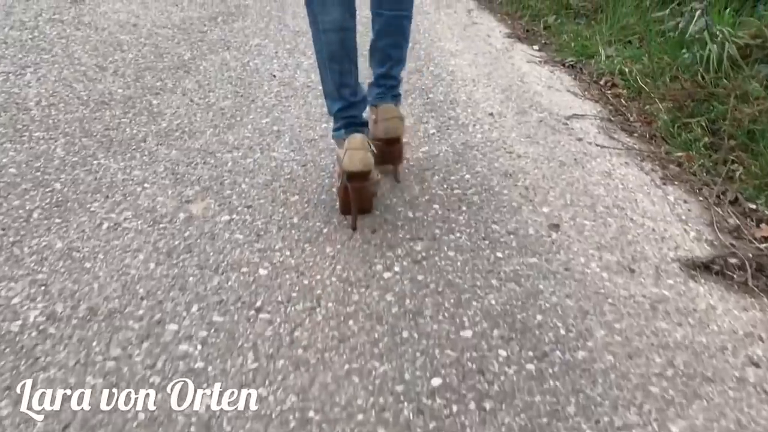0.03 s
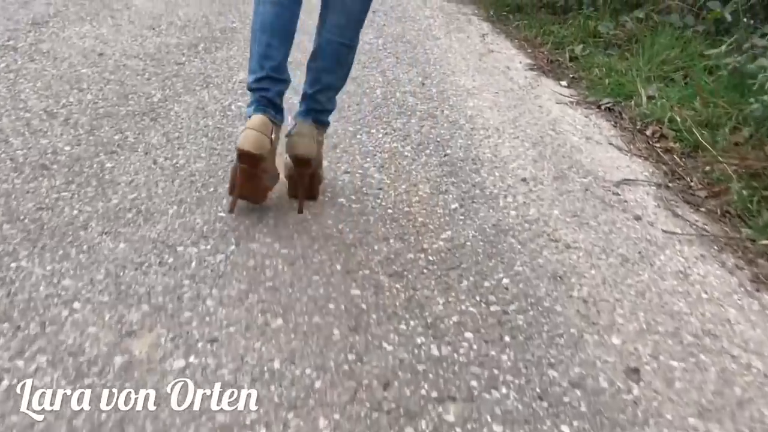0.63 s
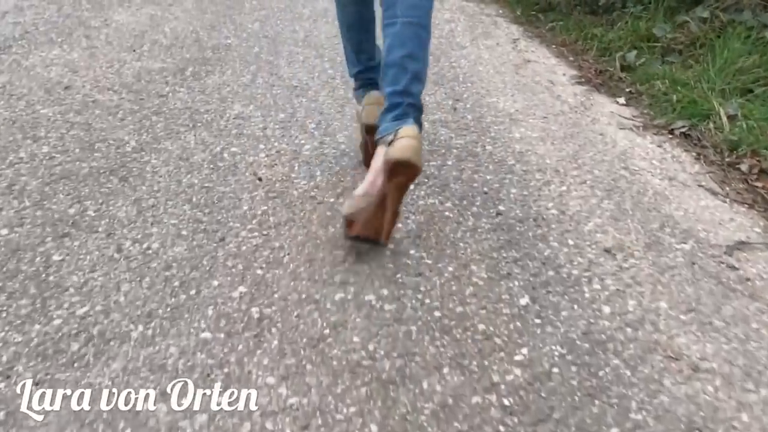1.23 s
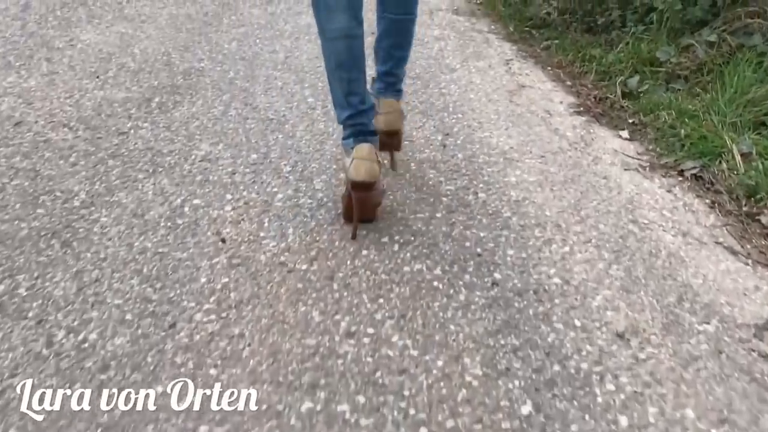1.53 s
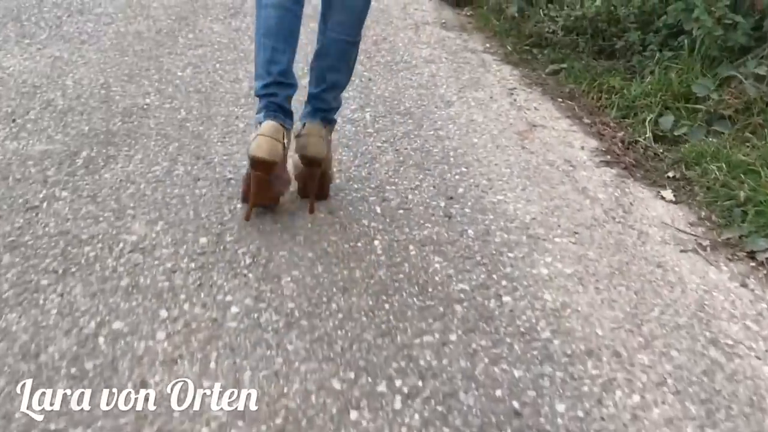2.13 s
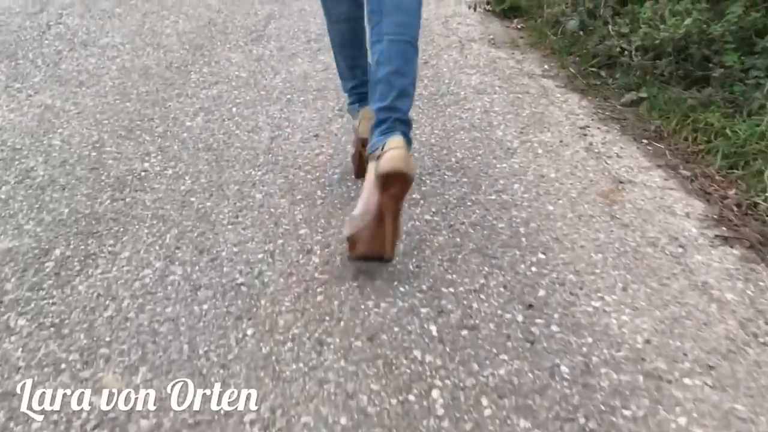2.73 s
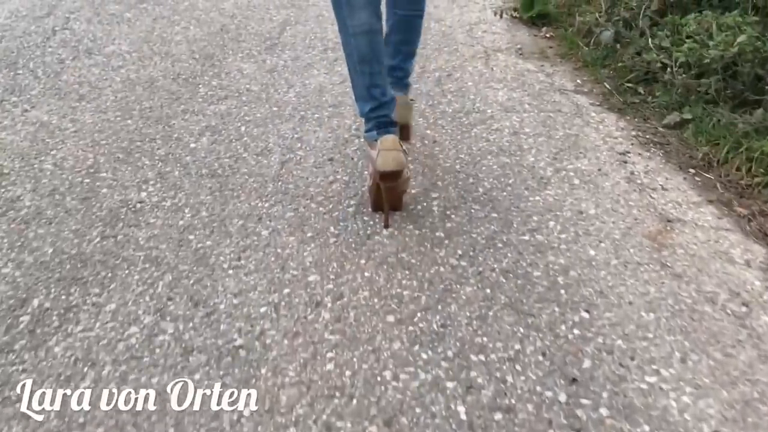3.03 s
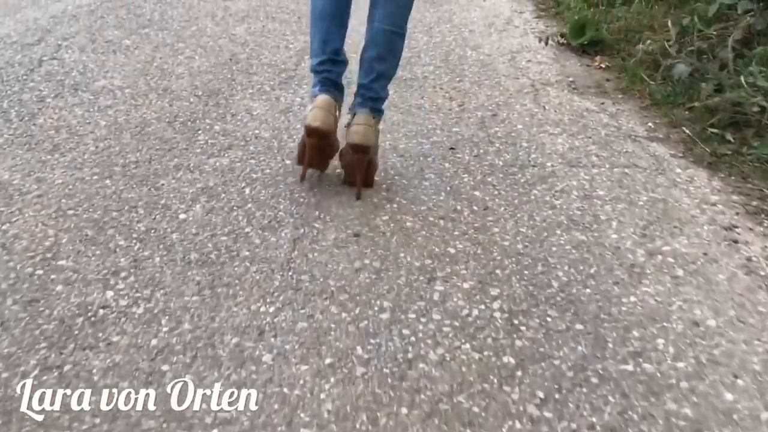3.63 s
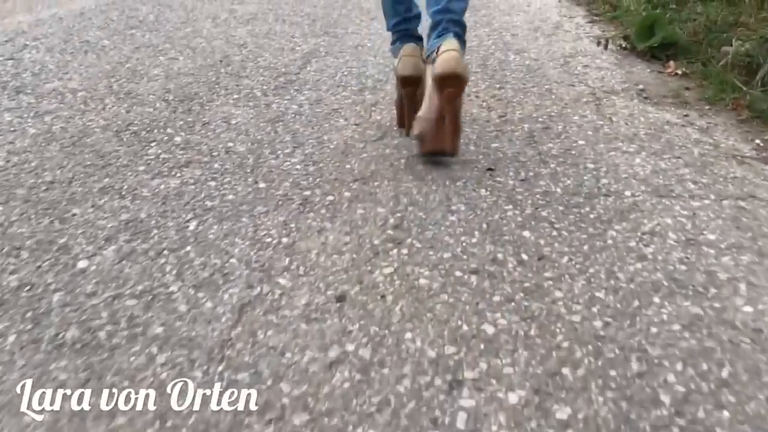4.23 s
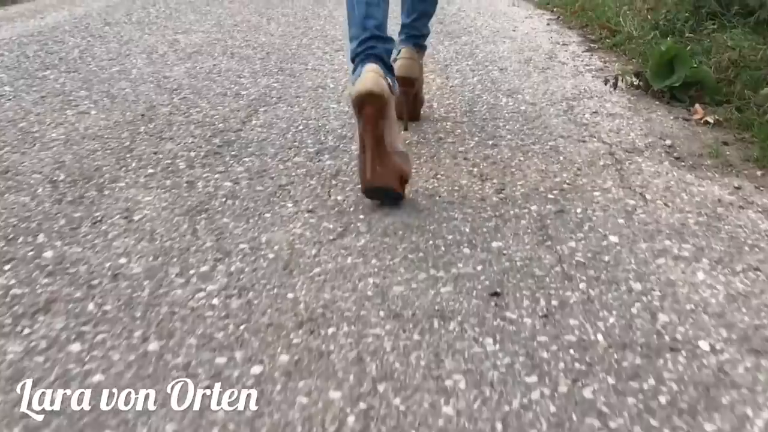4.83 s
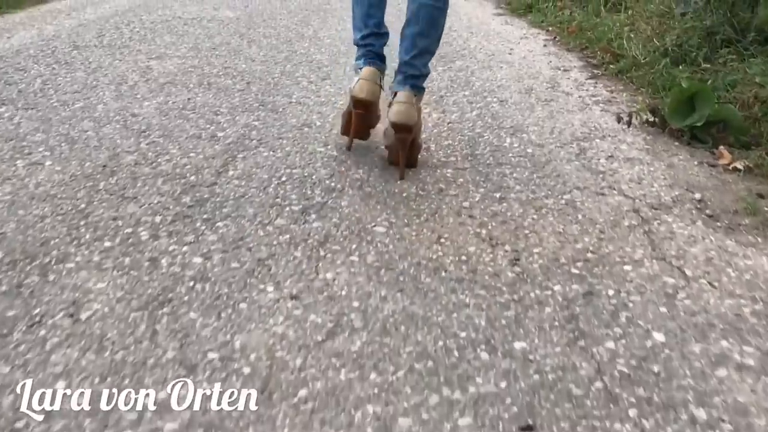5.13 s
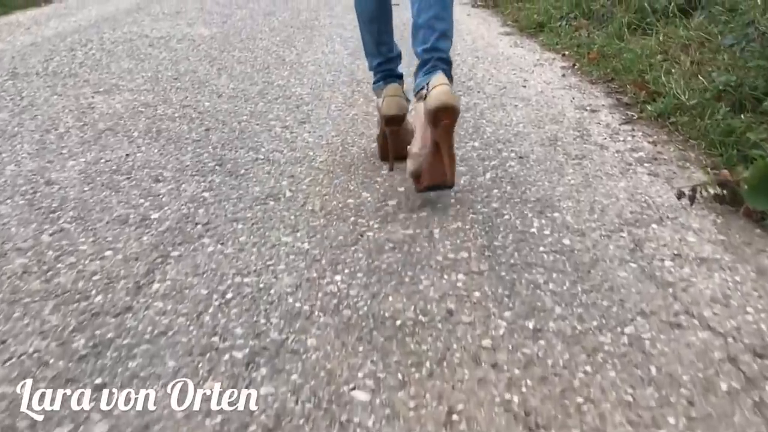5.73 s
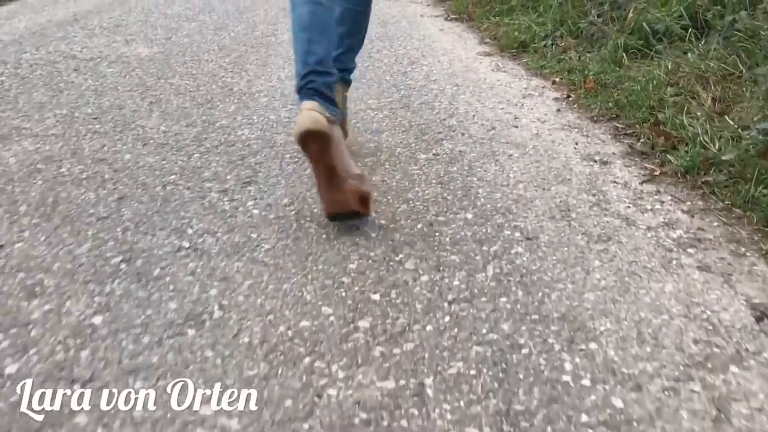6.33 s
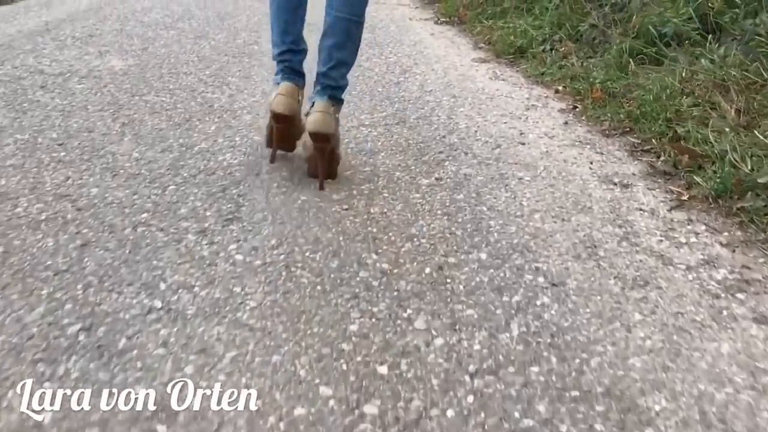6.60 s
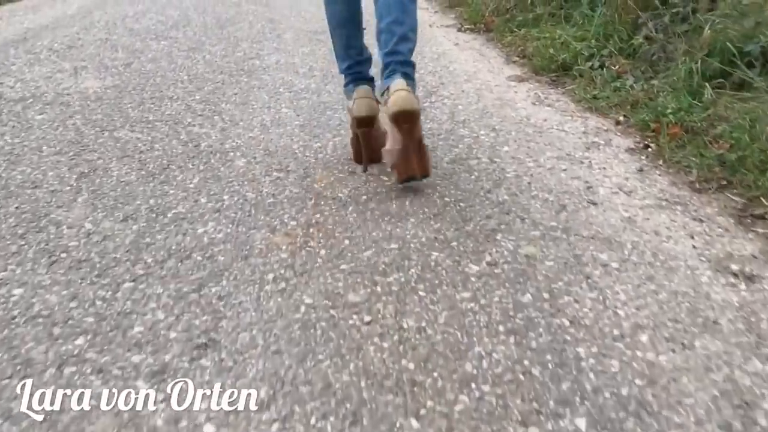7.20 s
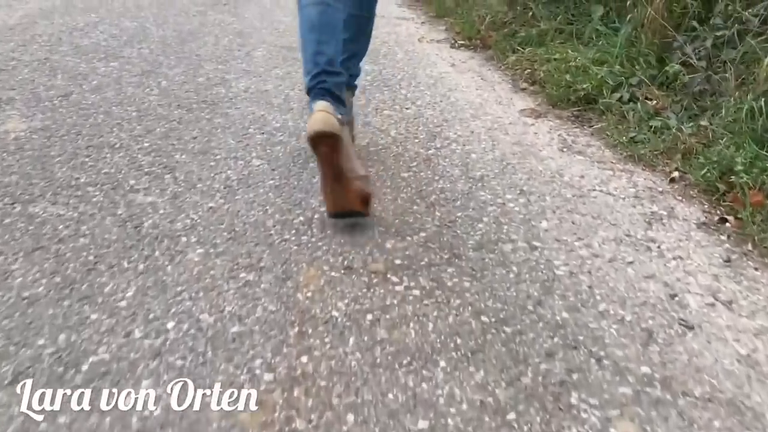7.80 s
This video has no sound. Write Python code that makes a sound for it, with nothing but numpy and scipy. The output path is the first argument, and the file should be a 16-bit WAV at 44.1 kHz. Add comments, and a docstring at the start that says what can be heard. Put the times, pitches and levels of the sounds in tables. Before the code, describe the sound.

A woman walks at an even, unhurried pace in platform high heels on a rough asphalt lane, the microphone following close behind. Each step is a dull heel thump and a hollow sole clack with a gritty scuff. Jeans brush softly between steps. Past the middle a shoe catches the ground twice, then a piece of grit snaps sharply. Faint open air, far traffic and one small bird chip lie underneath.

```python
"""Platform heels on asphalt

A woman walks along a rough lane, the microphone following her. Impacts excite the damped modes of each
shoe: a dull heel thump, then a hollow clack of the sole. Friction, a shower of tiny slips, gives the
gritty roll, the other shoe's push-off and the brush of jeans. Grit snaps underfoot, a swinging shoe
catches the ground twice, a bird chips once, and far traffic hums."""
import sys
import numpy as np
from scipy import signal
from scipy.fft import rfft, irfft, next_fast_len
from scipy.io import wavfile

SR = 44100
rng = np.random.default_rng(int(sys.argv[2]) if len(sys.argv) > 2 else 0)


def pcm_store(signal):
    """Save signal as 16-bit PCM."""
    levels = np.round(np.clip(np.atleast_2d(signal), -1, 1) * 32767)
    wavfile.write(sys.argv[1], SR, levels.astype(np.int16).T)


N = 346626

# Spectra of open air, sole friction, crunching stones and rubbed denim: f/Hz, relative level/dB
AIR_SPECTRUM = [(15, -62), (28, -24.5), (42, -1.5), (80, -2), (125, -10.5), (200, -14.5), (450, -24.5),
                (760, -24.5), (1400, -25.5), (1900, -30), (2700, -31), (5000, -39), (9400, -42.5),
                (10400, -45.5), (12000, -42), (16000, -44.5)]
SCUFF_SPECTRUM = [(100, 8), (400, 5.5), (900, 2.5), (1700, 1.5), (3000, -0.5), (4500, -7.5), (6500, -8.5),
                  (8000, -15.5), (9400, -11.5), (10500, -20), (12000, -14), (14300, -17), (16000, -21)]
CRUNCH_SPECTRUM = [(800, -30), (2000, 4), (2700, -4), (3300, 4.5), (4000, -4), (5500, -33), (9000, -39),
                   (16000, -32.5)]
DENIM_SPECTRUM = [(300, -27), (1500, -3.5), (2500, -4), (3400, 3), (4600, 2.5), (6300, 3), (8000, -1.5),
                  (10500, -2), (13500, -1), (16000, 1)]
# Far cars: nearest t/s, time to fall 3 dB/s (sign immaterial), low roar/dB, upper roar/dB
CARS = [(0, 1.55, -67.5, -65), (3.1, -4.4, -74.5, -71), (5.7, -0.37, -64, -72), (7.598, 0.2, -71.5, -72.5)]
# Far engine notes: start t/s, end t/s, start f/Hz, end f/Hz, level/dB
ENGINES = [(-.3, 6.5, 61.7, 68.25, -57), (6.5, 8, 81.85, 79.4, -60)]
# Modes of heel, sole and grit, before each impact scales them: f/Hz, relative level/dB, T60/s
HEEL_MODES = [(122.2, 5.5, 0.033), (215.7, -6.5, 0.035), (344.1, -10.5, 0.021), (766, -13, 0.003),
              (1345, -16.5, 0.012), (2500, -18, 0.0034)]
SOLE_MODES = [(181, -7.5, 0.023), (338, -3, 0.016), (424, -0.5, 0.0076), (673, -13, 0.019),
              (1096, 9.5, 0.0057), (1222, -2, 0.012), (1730, -2.5, 0.0057), (3450, -9, 0.0039)]
GRIT_MODES = [(2160, -35, 0.00092), (2800, -5.5, 0.002), (3090, 3, 0.00308), (5560, -6.5, 0.00069),
              (8140, -23, 0.0016), (12800, -28, 0.0007)]
# Impacts of heels landing, platforms rocking on the uneven road and large grains snapping:
# t/s, peak level/dB, upper-mode gain/dB, frequency ratio
HEEL_STRIKES = [(.298, -50.5, 1, 0.75), (1.036, -34, 7.5, 0.803), (1.772, -38, 7, 0.75),
                (2.463, -37, 5.5, 0.81), (3.261, -36.5, 7.5, 0.67), (3.924, -33.5, 2, 0.95),
                (4.709, -30.5, 4, 0.92), (5.448, -34, 3, 0.92), (6.134, -35, 7, 0.84), (6.875, -41, 2, 0.8),
                (7.507, -37, 7, 1.48)]
SOLE_ROCKS = [(.447, -39, -14, 1.06), (.456, -43.5, -14, 0.96), (1.189, -42.5, -7, 0.79),
              (1.263, -42.5, -18, 1), (1.898, -42.5, -19, 0.94), (2.6927, -38, -1.5, 0.74),
              (3.339, -30, -3, 0.96), (3.379, -40, -6, 1.63), (3.420, -42.5, -10, 0.9),
              (4.1259, -35, -9.5, 1.43), (4.808, -36.5, -21, 1.01), (4.833, -46, 0, .9),
              (4.949, -41, -2.5, 0.886), (5.186, -39.5, 7, 0.94), (5.555, -34.5, -7.5, 0.84),
              (6.191, -41.5, -16, 1.19), (6.233, -35.5, -11, 1.3), (6.871, -40, -9.5, .83),
              (6.977, -37.5, -17, 1.42), (7.0, -44, -18, 0.93), (7.505, -45, -11, 1.88),
              (7.613, -40, -9.5, 1.1)]
GRIT_SNAPS = [(.396, -43, -3, 0.83), (.673, -43, 7, 1.03), (1.103, -47, -3, 0.91), (2.097, -47.5, 21, 1.1),
              (3.329, -40, 14.5, 0.94), (3.342, -36.5, -20, 3.02), (3.42, -38.5, -6, 0.92),
              (4.773, -43.5, 17, 1.08), (4.810, -36, -8, .64), (4.838, -41, 24.5, 1.04),
              (4.855, -41, 20, 1.1), (4.878, -48, 6, 1.27), (5.170, -29.5, 22, 1.2),
              (5.316, -26.5, -4, 0.73), (5.6255, -39, 1.5, 0.99), (6.2474, -28.5, 2, 1), (6.2523, -8, 1, 1),
              (6.326, -42.5, -9, .97), (7.033, -30.5, 11, 0.96), (7.7092, -44.5, 7, 0.99),
              (7.7447, -39.5, 7, 1.15)]
# Soles landing: the four impact columns, skid/dB, roll/dB, roll tilt/(dB per octave), push-off/dB
SOLE_LANDINGS = [(0.3644, -27.5, 0, 1.02, -61.5, -59, 0.5, -55.5),
                 (1.1001, -28, -18.5, 1.18, -60.5, -60, 2, -58),
                 (1.8687, -29.5, -5.5, 1.08, -56, -63.5, -10, -58),
                 (2.605, -26.5, -4, 0.99, -60, -64.5, .5, -57),
                 (3.3418, -18.5, -2.5, 1.003, -60, -75, 2, -54.5),
                 (4.032, -39.5, -18, 0.91, -63, -62, 2, -71),
                 (4.7697, -27, -8.5, 1.06, -58.5, -64, -9, -60),
                 (5.560, -31.5, -16, 1.08, -56.5, -60.5, 0, -61.5),
                 (6.250, -30, 5, 1.1, -58, -58.5, -0.5, -53),
                 (6.9706, -37, -3, 1.13, -58.5, -62.5, -2, -57.5),
                 (7.6887, -35, 1.5, 0.84, -53, -65, -11.5, -62)]
# Legs brushing: centre t/s, level/dB, duration/s, tilt/(dB per octave), squeak level/dB, squeak f/Hz
JEANS_BRUSHES = [(0.804, -52.5, .018, -8, -71, 3160), (1.425, -56, .037, -5, -52, 3180),
                 (1.523, -56.5, 0.061, -9, -63, 4300), (3.012, -56, 0.062, -8, -58, 4360),
                 (3.644, -52.5, 0.037, -4.5, -54, 3800), (4.208, -59.5, .035, -4, -57, 4300),
                 (5.087, -54, 0.0336, -3.5, -49, 3190), (5.85, -53.5, .029, -3.5, -45, 3740),
                 (6.591, -51.5, .042, -8.5, -51.5, 4000), (7.292, -52, 0.035, -6.5, -47, 3150)]
# Noise bands of the bird's chip: t/s, level/dB, f/Hz, width/Hz, T60/s
CHIP_BANDS = [(2.291, -57.5, 5250, 650, 0.19), (2.297, -60, 4080, 700, .14)]
# A shoe sliding out of turn: centre t/s, level/dB, duration/s, tilt/(dB per octave)
SLIDES = [(3.342, -39, .005, 4), (4.055, -57.5, .022, 6.5), (6.205, -57, 0.1, -0.5),
          (6.254, -44.5, .016, -0.5), (6.882, -51, 0.029, -2), (6.932, -53, .058, -4),
          (7.036, -48, 0.014, 3), (7.075, -59.5, .06, -5), (7.104, -47, .0048, 8)]
# A swinging shoe catching the ground: t/s, bite level/dB, bite duration/s, drag level/dB,
# drag duration/s, drag tilt/(dB per octave), sole knock/dB, sole frequency ratio, heel knock/dB
CATCHES = [(5.1698, -38.5, .009, -49, .046, 4, -40.5, 1.96, -53),
           (5.317, -37, 0.014, -45.5, .026, 7, -27.5, 1.216, -25)]
# Phases of a step: centre t/s after the sole lands, duration/s
SKID, ROLL, PUSH_OFF = (.008, .029), (.087, .09), (.16, .048)


def amp(db):
    """Amplitude ratio of a level in decibels."""
    return 10 ** (np.asarray(db) / 20)


def unit(x):
    """Normalisation to rms 1."""
    return x / np.sqrt(np.mean(x ** 2) + 1e-20)


def level_at(spectrum, hz):
    """Level/dB interpolated on a log-frequency axis."""
    f, db = np.transpose(spectrum)
    return np.interp(np.log(hz + 1), np.log(f + 1), db)


def add(mix, s, sound):
    """Superposition of a sound on the mix from time s."""
    part = mix[max(round(s * SR), 0):][:len(sound)]
    part += sound[:len(part)]


def colour(x, gain):
    """Linear filtering by gain(f), normalised to rms 1."""
    size = next_fast_len(len(x) + 512)
    return unit(irfft(rfft(x, size) * gain(np.fft.rfftfreq(size, 1 / SR)), size)[:len(x)])


def band(size, hz, width_hz):
    """Noise in a Gaussian band."""
    return colour(rng.standard_normal(size), lambda f: np.exp(-2 * ((f - hz) / width_hz) ** 2))


def drift(rate_hz, size=N):
    """Random fluctuation: low-pass noise of rms 1."""
    return colour(rng.standard_normal(size), lambda f: np.exp(-(f / rate_hz) ** 2))


def open_air():
    """Amplitude-modulated noise: open air, and lumpy rumble at the moving microphone."""
    air = colour(rng.standard_normal(N), lambda f: amp(level_at(AIR_SPECTRUM, f)))
    air *= amp(-56.5 + .42 * drift(4.7))
    rumble = amp(-68.5 + 3.4 * drift(7)) * band(N, 48, 40)
    return air + rumble


def far_tyres():
    """Spherical spreading: each car's roar falls as 1/distance, and the cars add in power."""
    t = np.arange(N) / SR
    nearest_s, passing_s, low_db, upper_db = np.transpose(CARS)[:, :, None]
    nearness = 1 / np.hypot(1, (t - nearest_s) / passing_s)
    low, upper = (np.linalg.norm(amp(db) * nearness, axis=0) for db in (low_db, upper_db))
    return low * band(N, 1197, 380) + upper * band(N, 1810, 750)


def far_engines(fade_s=.57, waver_hz=.49):
    """Frequency modulation: each low drone follows its engine's creeping, wavering speed."""
    out, t = np.zeros(N), np.arange(N) / SR
    for start, end, first_hz, last_hz, db in ENGINES:
        hz = np.interp(t, [start, end], [first_hz, last_hz]) + waver_hz * drift(1.63)
        fade = np.clip(np.minimum(t - start, end - t) / fade_s, 0, 1)
        out += fade * amp(db + 1.7 * drift(4.1)) * unit(np.sin(2 * np.pi * np.cumsum(hz) / SR))
    return out


def impacts(rows, modes, split_hz, rise, rough, sag=0):
    """Modal ringing: each mode swells in, the longer-ringing ones more slowly, then decays; hard contact
    favours modes above split_hz."""
    out = np.zeros(N)
    hz, db, t60 = np.transpose(modes)[:, :, None]
    t = np.arange(int(1.7 * t60.max() * SR)) / SR
    swell = (1 - np.exp(-t / (rise * t60))) ** 2
    # pressed material is stiffer, so the pitch starts high and sags
    cycles = np.cumsum(hz * (1 + sag * (1 - swell)), axis=1) / SR
    for s, peak_db, upper_db, ratio in rows:
        gain = amp(db + upper_db * (hz > split_hz) - 60 * t / t60) * (hz * ratio < SR / 2)
        ring = (gain * swell * np.sin(2 * np.pi * ratio * cycles)).sum(0)
        # the coarse surface adds tiny after-contacts
        chatter = np.resize(rng.standard_normal(4096), len(t)) * np.exp(-4 * t / np.median(t60))
        contact = rough * unit(chatter) / np.sqrt(len(t))
        contact[0] = 1
        ring = signal.fftconvolve(ring, contact)[:len(t)]
        add(out, s, amp(peak_db) * ring / abs(ring).max())
    return out


def shoe_knocks():
    """Impact excitation: heel and sole land in turn, and each settles with lighter knocks."""
    heels, soles = list(HEEL_STRIKES), [row[:4] for row in SOLE_LANDINGS + SOLE_ROCKS]
    for s, db, _, ratio in HEEL_STRIKES:
        soles.append((s + .011 + .014 * rng.random(), db - 12.5, -6, ratio * .83))
    soles += [(s + .047, -48.5, -14, 1.2) for s, *_ in HEEL_STRIKES]  # the thin heel teeters once
    for s, _, _, ratio, *_ in SOLE_LANDINGS:  # the weight settles
        soles.append((s + .02 + .04 * rng.random(), -50.5, -9, ratio))
    # a catch jolts the whole shoe: a deep thud, then heel and sole ring together
    for s, *_, sole_db, ratio, heel_db in CATCHES:
        heels += [(s - .004, heel_db - 5, -13, .745), (s, heel_db, 10, 1.36)]
        soles.append((s - .0015, sole_db, -36, ratio))
    thumps = impacts(heels, HEEL_MODES, split_hz=280, rise=.16, rough=.23, sag=.57)
    clacks = impacts(soles, SOLE_MODES, split_hz=850, rise=.23, rough=.27, sag=.075)
    return thumps + clacks


def friction(rows, spectrum, slips_per_s, spread_db, hiss):
    """Friction as shot noise: each stroke is a shower of uneven slips over a smooth hiss."""
    out = np.zeros(N)
    for s, db, length, tilt_db in rows:
        size = max(int(length * SR), 64)
        slips = (rng.random(size) < slips_per_s / SR) * rng.choice([-1, 1], size)
        strength = amp(spread_db * np.minimum(rng.exponential(1, size), 4))
        drive = unit(slips * strength) + hiss * rng.standard_normal(size)
        rub = colour(
            drive, lambda f: amp(level_at(spectrum, f) + tilt_db * np.log2(np.maximum(f, 500) / 3000)))
        add(out, s - length / 2, amp(db) * rub * np.sin(np.linspace(0, np.pi, size)))
    return out


def stroke(landing_s, phase, db, tilt_db=2.5):
    """Friction stroke for one phase of a step, timed from the sole's landing."""
    lag_s, length = phase
    return landing_s + lag_s, db, length, tilt_db


def scuffs():
    """Sliding and rolling friction: the sole skids and crunches over stones; the other shoe pushes off."""
    rolls, scrapes = [], list(SLIDES)
    for s, *_, skid_db, roll_db, roll_tilt_db, push_db in SOLE_LANDINGS:
        rolls.append(stroke(s, ROLL, roll_db, roll_tilt_db))
        scrapes += [stroke(s, SKID, skid_db), stroke(s, PUSH_OFF, push_db)]
    grind = friction(scrapes + rolls, SCUFF_SPECTRUM, slips_per_s=1500, spread_db=3, hiss=.38)
    presses = [(s, db - 2, length, 0) for s, db, length, _ in rolls]
    crunch = friction(presses, CRUNCH_SPECTRUM, slips_per_s=290, spread_db=1, hiss=.17)
    # the sole touches lightly before and after each roll
    grazes = [(s, -65.5, length + .2, 1) for s, _, length, _ in rolls]
    touch = friction(grazes, SCUFF_SPECTRUM, slips_per_s=400, spread_db=7, hiss=1)
    return grind + crunch + touch


def grit(small_per_step=3, stray_count=16):
    """Impulses ring high, brief modes: grains snap under load, and strays drop off the shoes."""
    small = [(s + .15 * late, -56 + 9 * big, 14, .9 + .7 * pitch)
             for s, *_ in SOLE_LANDINGS for late, big, pitch in rng.random((small_per_step, 3))]
    strays = [(when * N / SR, -58 + 4 * big, 19, .95 + .3 * pitch)
              for when, big, pitch in rng.random((stray_count, 3))]
    return impacts(GRIT_SNAPS + small + strays, GRIT_MODES, split_hz=4200, rise=.26, rough=.15)


def jeans():
    """Cloth friction: denim rubs on denim as the legs pass."""
    brushes = [row[:4] for row in JEANS_BRUSHES]
    return friction(brushes, DENIM_SPECTRUM, slips_per_s=3500, spread_db=5.5, hiss=.97)


def squeaks(singing_share=.67):
    """Stick-slip oscillation: a rising, wobbling note from denim ribs and, once, from a sole edge."""
    out = np.zeros(N)
    ribs = [(s, db, singing_share * length, hz) for s, _, length, _, db, hz in JEANS_BRUSHES]
    sole_edge = (CATCHES[0][0], -33, .009, 3010)
    for s, db, length, hz in ribs + [sole_edge]:
        progress = np.linspace(-.5, .5, int(length * SR))
        wobble = drift(700, len(progress))
        cycles = np.cumsum(hz * (1 + .143 * progress + .036 * wobble)) / SR
        add(out, s - length / 2, amp(db) * np.cos(np.pi * progress) ** 2 * np.sin(2 * np.pi * cycles))
    return out


def bird():
    """Exponential decay of narrow-band noise: a buzzy chip dies away in the hedge."""
    out, t = np.zeros(N), np.arange(SR // 4) / SR
    for s, db, hz, width_hz, t60 in CHIP_BANDS:
        envelope = amp(db - 60 * t / t60) * (1 - np.exp(-t / .0055))
        add(out, s, envelope * band(len(t), hz, width_hz))
    return out


def catch_rasps(bite_tilt_db=4, drag_lag_s=.0086):
    """Fast friction crowds the slips into a rasp as a swinging shoe bites the road, then drags."""
    strokes = []
    for s, bite_db, bite_s, drag_db, drag_s, drag_tilt_db, *_ in CATCHES:
        strokes += [(s, bite_db, bite_s, bite_tilt_db), (s + drag_lag_s, drag_db, drag_s, drag_tilt_db)]
    return friction(strokes, SCUFF_SPECTRUM, slips_per_s=5400, spread_db=3.5, hiss=.66)


def verge_echo(x, wet_db, t60):
    """Diffuse scattering from road and bushes: convolution with a dull, decaying noise tail."""
    t = np.arange(SR // 2) / SR
    scatter = colour(rng.standard_normal(len(t)), lambda f: 1 / (1 + (f / 3000) ** 2))
    tail = scatter * amp(-60 * t / t60) * (1 - np.exp(-t / .005))
    return amp(wet_db) * signal.fftconvolve(x, tail / np.linalg.norm(tail))[:N]


def scene():
    """Superposition of air, traffic, the walker with her faint echo, and the bird."""
    background = open_air() + far_tyres() + far_engines()
    walker = shoe_knocks() + scuffs() + grit() + jeans() + squeaks() + catch_rasps()
    return (background + walker + verge_echo(walker, wet_db=-31.5, t60=.12) + bird())[None]


def record(dry):
    """Band limiting: the microphone sheds the deepest rumble and the highest treble."""
    low_hz, high_hz = 28, 15950
    thinned = signal.sosfilt(signal.butter(2, low_hz, "highpass", fs=SR, output="sos"), dry)
    lowpass = signal.firwin(511, high_hz, window=("kaiser", 9), fs=SR)
    return signal.oaconvolve(thinned, lowpass[None], "same")


dry = scene()
out = record(dry)
pcm_store(out)
```